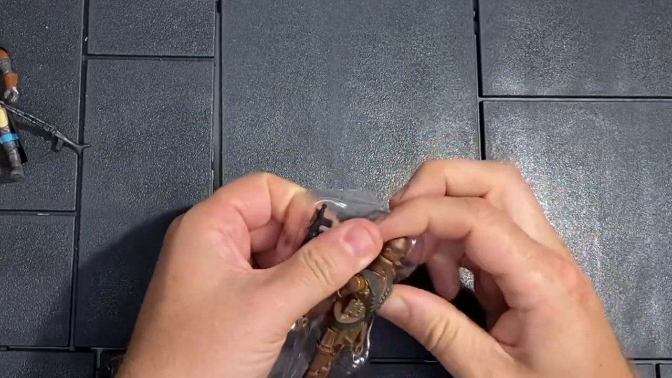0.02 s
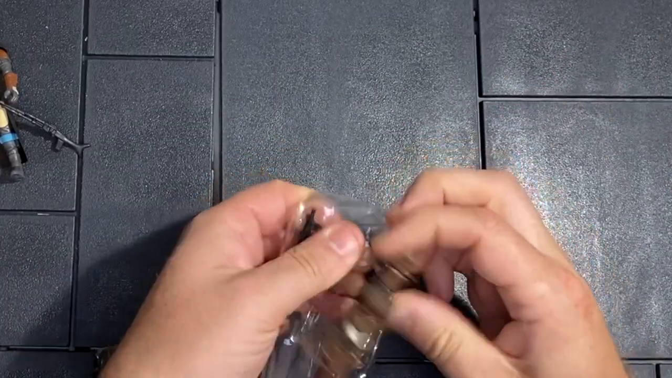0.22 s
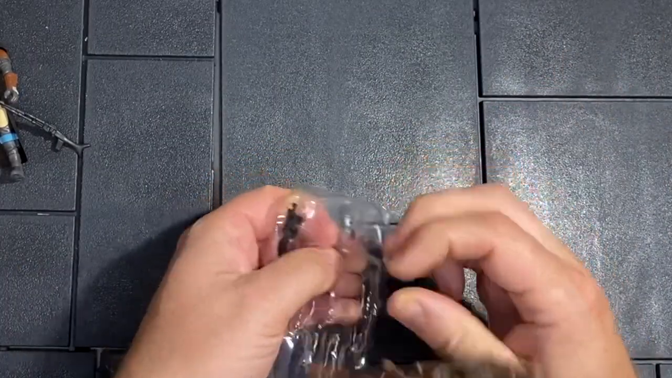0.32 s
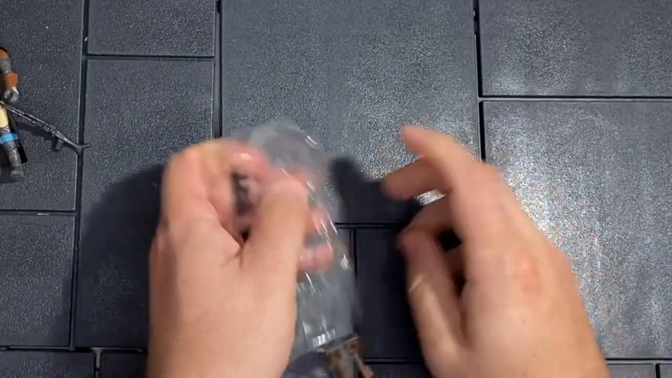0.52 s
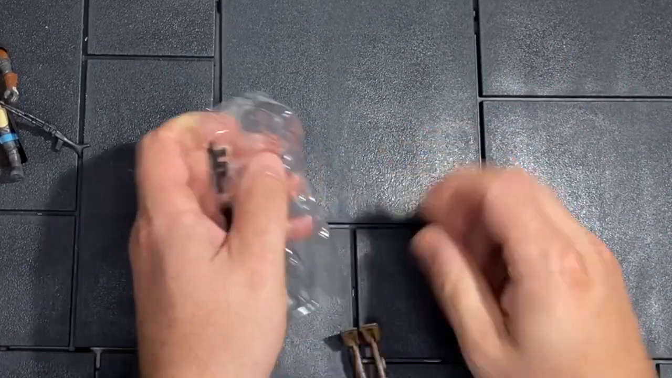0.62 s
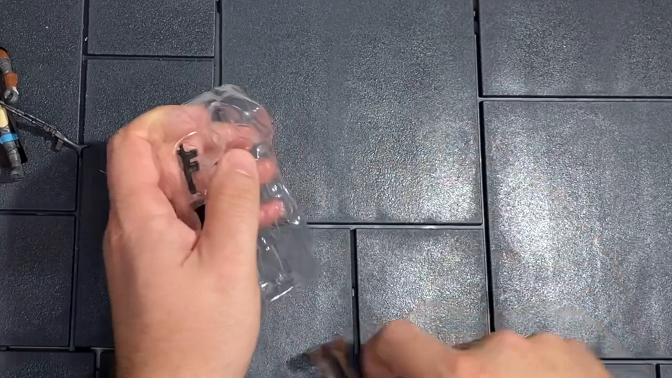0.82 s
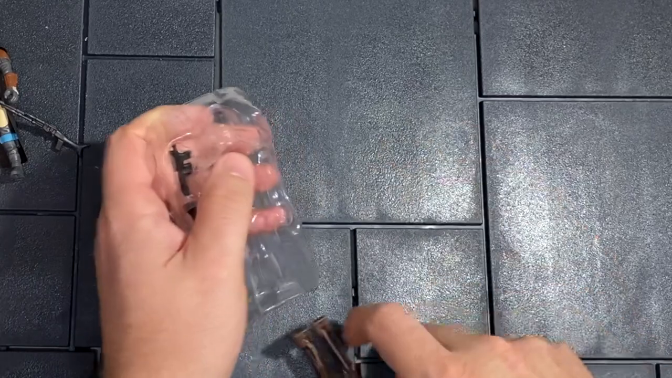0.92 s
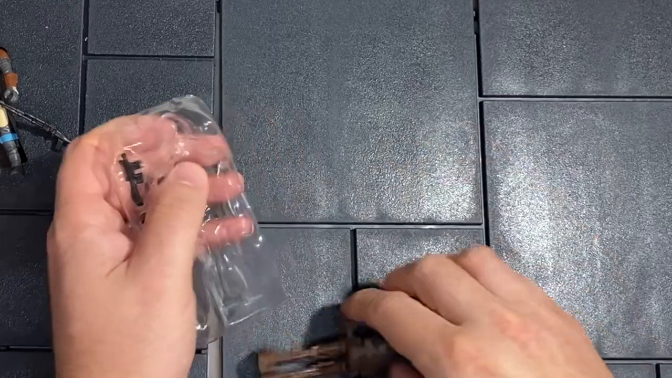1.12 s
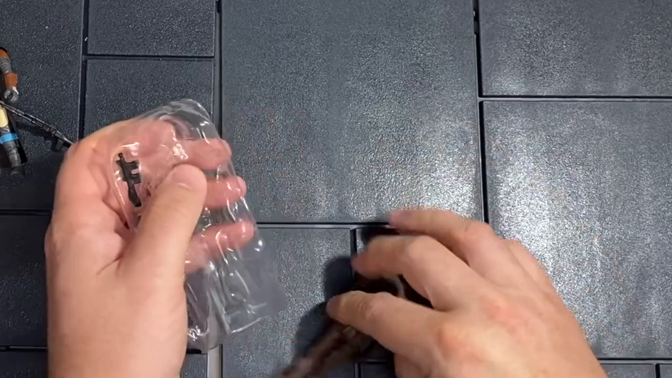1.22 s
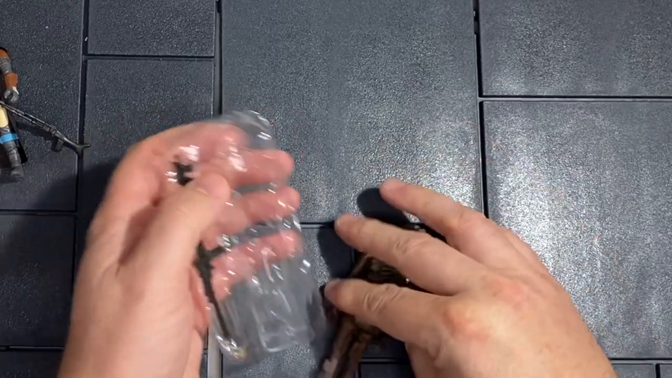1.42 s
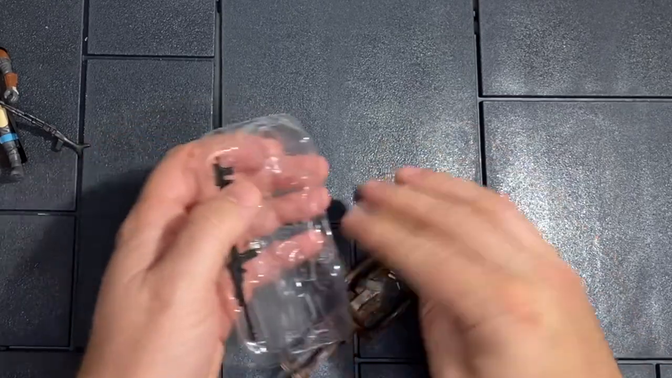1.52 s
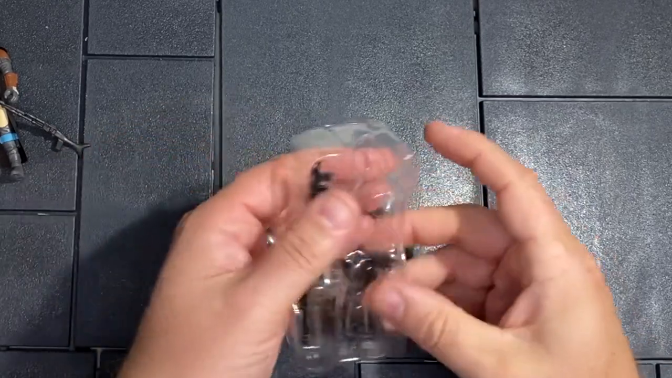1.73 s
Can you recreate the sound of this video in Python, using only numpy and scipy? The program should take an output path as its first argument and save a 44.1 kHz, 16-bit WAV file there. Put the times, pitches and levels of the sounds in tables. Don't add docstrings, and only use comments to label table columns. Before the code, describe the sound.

Stiff plastic shell buckles in sharp cracks, a plastic toy drops, knocks, and scrapes on a hollow tabletop

```python
import sys
import numpy as np
from scipy import signal
from scipy.fft import rfft, irfft
from scipy.io import wavfile
from scipy.ndimage import uniform_filter1d

SR = 44100
rng = np.random.default_rng(int(sys.argv[2]) if len(sys.argv) > 2 else 0)


def digitize_waveform(pressure):
    field = np.atleast_2d(pressure).T
    bounded = np.clip(field, -1, 1)
    quanta = np.round(bounded * 32767).astype(np.int16)
    wavfile.write(sys.argv[1], SR, quanta)


def magnitude_from_level(level_db):
    exponent = np.asarray(level_db, float) / 20
    return 10 ** exponent


N = 79380

# start_s, peak_db, pitch_hz, ripple_s
WALL_SNAPS = [(.002, -33.5, 1010, 0.006), (0.026, -37, 1160, 0.0027), (0.0885, -17, 2250, 0.003),
              (0.0896, -21, 1050, 0.0044), (0.094, -21, 1100, 0.0096), (0.173, -20.5, 1140, 0.0057),
              (0.1836, -19.5, 925, 0.0031), (0.186, -21, 1725, 0.0036), (0.193, -19, 1300, 0.005),
              (0.196, -19.5, 1800, 0.0024), (0.203, -24.5, 990, .002), (0.209, -23, 950, 0.0049),
              (0.2143, -21, 960, 0.002), (0.223, -17.5, 1000, .003), (0.226, -10.5, 940, 0.0064),
              (0.23, -2, 1460, .002), (0.231, 0, 960, 0.0037), (0.2385, -0.5, 2400, 0.0028),
              (.242, -5.5, 1350, 0.0027), (0.2568, -10.5, 1290, 0.0034), (0.2641, -1.5, 1530, 0.0061),
              (0.2675, 0.5, 940, 0.0026), (0.275, -5, 760, 0.002), (0.2808, -10, 680, 0.0016),
              (0.2835, -6, 2984, 0.0038), (0.29, -24, 2300, .003), (0.3108, -14, 1090, 0.0037),
              (0.3154, -19, 1303, .003), (0.3217, -21, 996, .002), (0.334, -24, 1350, 0.002),
              (.338, -17.5, 960, 0.006), (0.406, -25, 1050, 0.01), (.439, -17.5, 907, 0.012),
              (0.4825, -19.5, 1020, 0.002), (0.49, -22.5, 900, 0.0072), (0.505, -14.5, 1910, .003),
              (0.5224, -3, 3060, 0.0045), (1.516, -42.5, 2600, 0.026), (1.598, -40.5, 2195, 0.075),
              (1.7337, -33, 1030, 0.0033), (1.737, -36.5, 990, 0.0053), (1.7535, -43, 950, 0.0023),
              (1.7599, -33.5, 1050, 0.0024), (1.766, -34, 955, 0.0059), (1.77, -37, 1900, 0.006),
              (1.775, -36.5, 4400, 0.014)]
# start_s, peak_db, ripple_s
EDGE_CRACKS = [(0.161, -31, 0.011), (0.229, -9, 0.01), (0.234, -14, 0.0095), (0.261, -10, 0.023),
               (0.023, -30.5, 0.0024), (0.328, -29, 0.014), (0.448, -16.5, 0.015), (0.522, -21, 0.00089),
               (0.544, -17, 0.0094), (1.208, -29, 0.003), (1.735, -47, .006), (1.755, -37.5, 0.033)]
# time_s, level_db
CRINKLE_LEVEL = [(0, -50.5), (.13, -59.5), (.17, -42.5), (.23, -32.5), (.29, -28), (.36, -37), (.4, -46.5),
                 (.46, -46.5), (.54, -25), (.73, -63.5), (.8, -65), (1.45, -71.5), (1.52, -59.5),
                 (1.6, -62.5), (1.66, -52.5), (1.725, -78.5), (1.74, -49), (1.8, -48)]
# pitch_hz, width_hz, level_db
SHELL_MODES = [(990, 430, 2), (1400, 95, 0.5), (2190, 26, -13.5), (2280, 39, -5), (3020, 16, -1),
               (3450, 49, -27), (4380, 23, -8)]
# pitch_hz, density_db
SHELL_SKIN = [(200, -27), (500, -8), (1000, -6.5), (2500, -6), (5000, -17.5), (11000, -32.5), (16000, -24)]
# start_s, peak_db, pitch_hz, table_ring_db
FIGURE_KNOCKS = [(0.5218, -0.5, 1500, 5.5), (0.5249, 5, 625, -4), (0.546, 1.5, 2090, 2.5),
                 (.559, -10, 2200, 5), (.577, -29, 2000, -6), (0.632, -14, 1350, 4.5),
                 (.838, -18.5, 776, 5), (0.855, -17.5, 1376, 2), (0.861, -24, 366, -16.5),
                 (0.9022, -29.5, 3840, -13.5), (.942, -33, 3660, -6), (1.008, -31, 643, -11),
                 (1.022, -41, 1800, -3), (1.055, -32, 4730, -11.5), (1.039, -26, 2720, 6),
                 (1.0768, -16, 1560, -5.5), (1.1214, -36, 1500, -11), (1.1445, -22.5, 2740, 5),
                 (1.385, -37, 330, -0.5), (1.466, -44, 640, -7.5), (1.281, -24.5, 1980, -19)]
# pitch_hz, level_db, t60_s
TABLE_MODES = [(211, -3, 0.059), (258, -8, 0.12), (337, -2.5, 0.082), (441.3, 12, 0.14), (625, -6, 0.017),
               (740, -7, 0.26), (829, -10, 0.047), (1018, 3.5, 0.075), (1261, 7, 0.13), (1500, -20.5, 0.16),
               (1715, -6.5, 0.057)]
# time_s, level_db
DRAG_LEVEL = [(.825, -64.5), (.84, -33.5), (.89, -38.5), (.95, -38.5), (.995, -57.5), (1.02, -38),
              (1.07, -35), (1.15, -32.5), (1.2, -39), (1.255, -35), (1.31, -45.5), (1.37, -57),
              (1.44, -64.5), (1.5, -53), (1.55, -51.5), (1.62, -60), (1.7, -56), (1.8, -72)]
# pitch_hz, density_db
SCUFF_COLOUR = [(200, 7.5), (600, -8.5), (1000, -4), (3000, -22), (7000, -41.5), (12000, -60.5),
                (16000, -67)]
# start_s, swell_s, peak_db, pitch_hz
TABLE_BOOMS = [(.275, .08, -45, 154.6), (.29, 0.048, -42, 308.5), (.31, .09, -48, 65.1),
               (.33, 0.031, -47.5, 295), (.425, 0.07, -51, 272), (.43, 0.038, -54.5, 66),
               (.53, 0.07, -27, 141), (.535, 0.16, -29.5, 63.9), (.56, .06, -30, 208.4),
               (.6, 0.083, -34.5, 65), (.62, 0.084, -40, 142.9), (.68, 0.05, -42.5, 61),
               (.84, 0.18, -38.5, 65.7), (.85, 0.054, -32.5, 250), (.94, .07, -47.5, 71),
               (1.07, 0.21, -36.5, 64.8), (1.08, 0.14, -37.5, 142.6), (1.215, 0.18, -36, 59.5),
               (1.245, 0.092, -36, 133), (1.318, 0.037, -33.5, 116), (1.33, 0.07, -44.5, 65.2),
               (1.39, 0.034, -47, 110), (1.4, .07, -50, 68), (1.485, 0.12, -40, 128),
               (1.52, 0.076, -38, 122.8), (1.545, 0.061, -43.5, 62.5), (1.6, 0.12, -57, 131),
               (1.645, 0.09, -51.5, 137), (1.73, 0.06, -53, 62)]
# start_s, swell_s, peak_db, pitch_hz
FIGURE_SHUDDERS = [
    (1.062, 0.04, -42, 641),
    (1.241, 0.041, -31.5, 631.8),
    (1.267, 0.01, -32, 483),
    (1.283, 0.033, -37, 656),
]
# pitch_hz, phase_rad
PORT_PHASE = [(0, 0), (2240, .3), (3700, 1.9), (4310, 1.2), (6980, 0), (7840, 2.7), (8610, 3.3), (9820, .5),
              (11800, -.4), (12700, -3), (16000, -6)]
# pitch_hz, difference_db
PORT_DIFFERENCE = [(60, -1.8), (900, -2.8), (4400, 1.5), (8000, -.6)]
# pitch_hz, gain_db
TREBLE_BALANCE = [(12300, 0), (12700, -20), (14000, -18), (14600, -3), (15700, -3), (16100, -35)]
# pitch_hz, density_db
ROOM_TONE = [(20, -27), (65, -0.5), (300, -23.5), (1100, -25), (2600, -24), (5000, -49.5), (16000, -58.5)]


def level(x, db):
    return x * magnitude_from_level(db) / np.sqrt(np.mean(x ** 2))


def band(x, hz, width):
    return signal.lfilter(*signal.iirpeak(hz, hz / width, fs=SR), x)


def double_band(x, hz, width):
    return band(band(x, hz, width), hz, width)


def colour(x, points):
    hz, db = np.array(points).T
    log_hz = np.log(np.linspace(1, SR / 2, 2049))
    cepstrum = irfft(np.interp(log_hz, np.log(hz), db) * np.log(10) / 20)
    cepstrum[1:2048] *= 2
    cepstrum[2049:] = 0
    response = irfft(np.exp(rfft(cepstrum)))
    return signal.fftconvolve(x, response, axes=-1)[:len(x)]


def clicks(size, per_s, spread_db):
    chance, sign, height = rng.random((size, 3)).T
    height_db = np.minimum(-spread_db * np.log(height + 1e-9), 4 * spread_db)
    return (chance < per_s / SR) * np.sign(sign - .5) * magnitude_from_level(height_db)


def walk(per_s):
    k = int(SR / per_s)
    steps = np.repeat(rng.standard_normal(N // k + 1), k)
    return 3.0 * uniform_filter1d(uniform_filter1d(steps, k), k)[:N]


def curve(points):
    time_s, db = np.array(points).T
    return magnitude_from_level(np.interp(np.arange(N) / SR, time_s, db, left=-120, right=db[-1]))


def add(out, x, start_s, db):
    i = int(start_s * SR)
    out[i:i + len(x)] += (x * magnitude_from_level(db) / np.max(np.abs(x)))[:N - i]


def snaps():
    out, t = np.zeros(N), np.arange(5000) / SR
    for start_s, db, hz, ripple_s in WALL_SNAPS:
        ripple = .5 * creases(len(t), 1100, 3.5) * np.exp(-t / max(ripple_s, .001))
        wall = double_band(ripple + 3.1 * (t == 0), hz, hz / 3.14 * 1.45)
        whole = shell(ripple + 0.72 * (t == 0), -20.5)
        add(out, level(wall, 0) + level(whole, -1.5), start_s, db + 2.0)
    return out


def cracks():
    out, t = np.zeros(N), np.arange(5000) / SR
    for start_s, db, ripple_s in EDGE_CRACKS:
        ripple = 0.42 * clicks(len(t), 6000, 3.0) * np.exp(-t / max(ripple_s, .001))
        ripple[0] = 1.7
        add(out, double_band(ripple, 7730, 5100), start_s, db - 0.5)
    return out


def crinkle():
    return shell(creases(N, 500, 1), -11.5) * curve(CRINKLE_LEVEL) * magnitude_from_level(1.2 * walk(40))


def creases(size, per_s, spread_db):
    out = np.zeros(size)
    for hz in 400 * 1.42 ** np.arange(11):
        rate = per_s * (hz / 3000) ** .5
        out += band(clicks(size, rate, spread_db), hz, hz / 2.6) * (3000 / hz) ** .25
    return out


def shell(x, modes_db):
    modes = np.zeros(len(x))
    for k, (hz, width_hz, db) in enumerate(SHELL_MODES):
        modes += (-1) ** k * magnitude_from_level(db) * band(x, hz, 2.7 * width_hz)
    return level(colour(x, SHELL_SKIN), 0) + level(modes, modes_db)


def knocks():
    out, t = np.zeros(N), np.arange(8000) / SR
    for start_s, db, hz, ring_db in FIGURE_KNOCKS:
        blow = .3 * clicks(len(t), 1500, 2.5) * np.exp(-t / .004)
        blow[0] = 2.2
        ring = level(tabletop(blow) * np.exp(-t / 0.026), ring_db)
        figure = level(band(band(blow, hz, hz / 4.6), hz, hz / 4.8), 0)
        skin = level(colour(blow, SHELL_SKIN), -18)
        add(out, ring + figure + skin, start_s, db - 1)
    return out


def tabletop(x):
    return sum(magnitude_from_level(db) * band(x, hz, 1.42 / t60_s) / np.sqrt(t60_s) for hz, db, t60_s in TABLE_MODES)


def drag():
    slip = clicks(N, 3000, 2.5) * magnitude_from_level(1.5 * walk(110))
    figure = level(band(slip, 625, 70), -4.5)
    table = level(tabletop(slip), -7)
    scuff = level(colour(creases(N, 700, 1), SCUFF_COLOUR), -1)
    return curve(DRAG_LEVEL) * (figure + table + scuff)


def swells(rows, rumble_db):
    out = np.zeros(N)
    size = int(.5 * SR)
    for start_s, swell_s, db, hz in rows:
        u = np.arange(size) / SR / swell_s
        wobble = 1 + .03 * walk(45)[:size]
        mode = np.sin(2 * np.pi * np.cumsum(hz * wobble) / SR) * magnitude_from_level(1.5 * walk(50)[:size])
        rumble = double_band(rng.standard_normal(size), 223, 220)
        swell = u ** 0.85 * np.exp(-(2.15 * u) ** 1.34)
        add(out, swell * (mode + level(rumble, rumble_db)), start_s, db + 4.5)
    return out


def booms():
    return swells(TABLE_BOOMS, -7.5)


def shudders():
    return swells(FIGURE_SHUDDERS, -31)


def ports(dry):
    hz = np.fft.rfftfreq(N, 1 / SR)
    phase = np.interp(hz, *np.array(PORT_PHASE).T)
    difference_db = np.interp(hz, *np.array(PORT_DIFFERENCE).T)
    half = np.exp(.5j * phase) * magnitude_from_level(.5 * difference_db)
    return irfft(rfft(dry) * np.array([half, 1 / half]), N)


def room_echo(dry):
    t, t60_s = np.arange(int(.4 * SR)) / SR, 0.17
    echo = rng.standard_normal((2, len(t))) * magnitude_from_level(-60 * t / t60_s) * (t > .003)
    echo = signal.lfilter(*signal.butter(2, [520, 9000], "band", fs=SR), echo)
    echo /= np.sqrt(np.sum(echo ** 2) / 2)
    return magnitude_from_level(-12) * signal.fftconvolve(dry[None], echo, axes=-1)[:, :N]


def room_tone():
    air = [level(colour(rng.standard_normal(N), ROOM_TONE), -64) for _ in range(3)]
    return air[0] + 0.16 * np.array(air[1:])


def scene():
    dry = snaps() + cracks() + crinkle() + knocks() + drag() + booms() + shudders()
    return ports(dry) + room_echo(dry) + room_tone()


def low_pass(x):
    return signal.sosfilt(signal.butter(12, 17020, fs=SR, output="sos"), x)


def record(dry):
    bass_cut = signal.butter(3, 53.4, "high", fs=SR, output="sos")
    mic = signal.sosfilt(bass_cut, [colour(x, TREBLE_BALANCE) for x in dry])
    mix = np.clip(mic, -1.0, 1.0)
    return low_pass(mix)


dry = scene()
out = record(dry)
digitize_waveform(out)
```